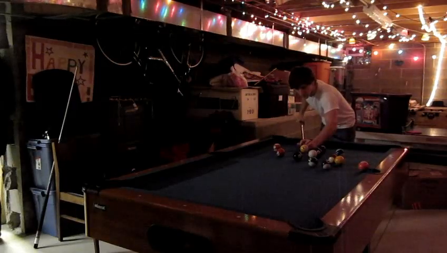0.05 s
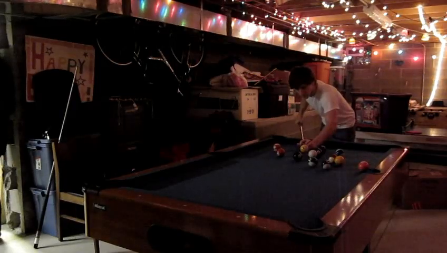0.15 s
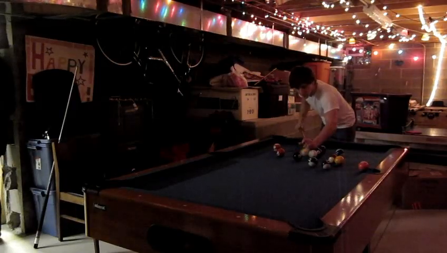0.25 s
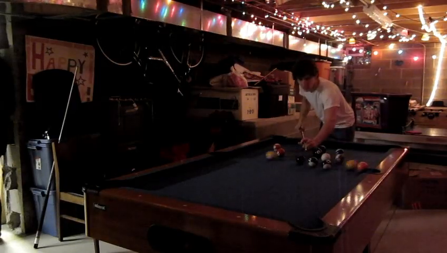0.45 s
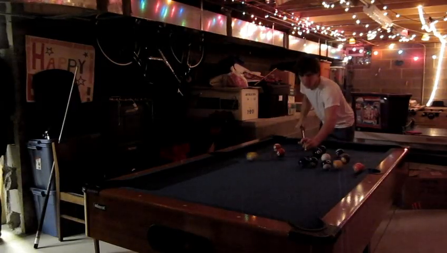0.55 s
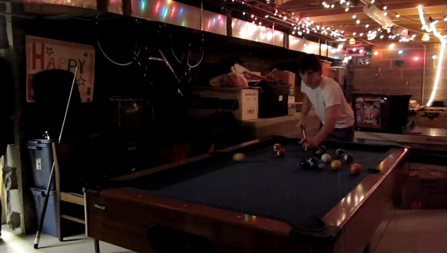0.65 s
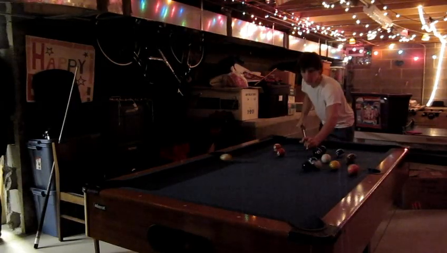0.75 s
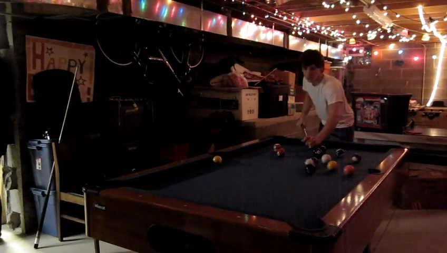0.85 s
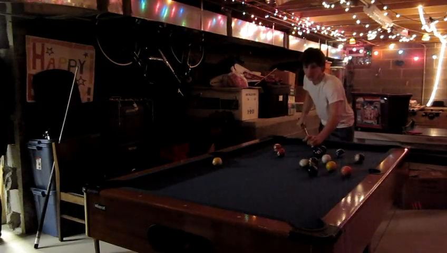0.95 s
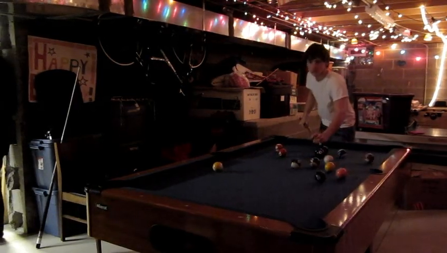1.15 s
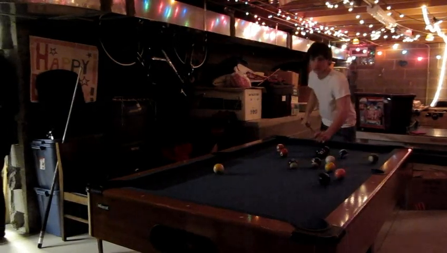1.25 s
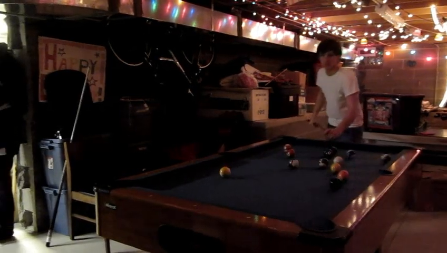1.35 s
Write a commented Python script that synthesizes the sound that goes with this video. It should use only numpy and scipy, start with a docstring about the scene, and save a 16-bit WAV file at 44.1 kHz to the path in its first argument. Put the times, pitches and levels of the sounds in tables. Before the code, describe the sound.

A pool cue cracks and balls clack together as a cluster scatters.

```python
"""Pool shot in a basement

A low room, one microphone within earshot of the table. The cue cracks, and the cue ball thuds on
the slate and scatters a cluster of balls. They clack, bump the cushions and roll nearer over a faint
hum and whine. The recorder's gain control ducks hard at the first clack and creeps back up."""
import sys
import numpy as np
from scipy import signal
from scipy.fft import rfft, irfft, next_fast_len
from scipy.io import wavfile
from scipy.ndimage import uniform_filter1d, minimum_filter1d

SR = 44100
rng = np.random.default_rng(int(sys.argv[2]) if len(sys.argv) > 2 else 0)


def output_pcm(signal):
    """Save a mono or channel-first signal as 16-bit PCM at the path in sys.argv[1].

    Samples are clipped to [-1, 1] before scaling.
    """
    pcm = np.clip(np.atleast_2d(signal).T, -1, 1) * 32767
    wavfile.write(sys.argv[1], SR, np.round(pcm).astype(np.int16))


N = 61739

# cue strike, then the ball landing and skipping: t/s, thud/dB, crack/dB, snap/dB
CUE_KNOCKS = [(0.2192, -5.5, -20, -11), (0.2532, -6, -39.5, -21), (.267, -14, -28, -17)]
# ball on ball: t/s, level/dB, pitch/Hz, room send/dB
BALL_CONTACTS = [(0.2789, 13.5, 2660, 0.5), (0.342, 14, 2660, -1.5), (0.3439, 8.5, 2350, -8.5),
                 (0.3455, 14, 2740, -7.5), (.4366, 9, 2685, 1), (0.477, 4, 2410, 1.5),
                 (0.6186, -1, 2300, 2.5)]


def amp(db):
    """Decibels to gain."""
    return 10 ** (np.asarray(db) / 20)


def along(points, hz):
    """Values at hz, read from (f/Hz, value) points on a log frequency axis."""
    freqs, values = np.transpose(points)
    return np.interp(np.log(hz + 1), np.log(freqs + 1), values)


def clock():
    """Time of every sample in seconds."""
    return np.arange(N) / SR


def fade(t, t60):
    """Exponential decay of 60 dB in t60 seconds."""
    return np.exp(-np.log(1000) * t / t60)


def delayed(x, seconds):
    """x starting that many seconds later."""
    return np.pad(x, (max(round(seconds * SR), 0), 0))[:N]


def filtered(x, response):
    """x through a zero-phase filter of gain response(hz)."""
    size = next_fast_len(N + SR // 2)
    return irfft(rfft(x, size) * response(np.fft.rfftfreq(size, 1 / SR)), size)[:N]


def noise(spectrum, shift=1):
    """Coloured noise of rms 1, its spectrum scaled in pitch by shift."""
    x = filtered(rng.standard_normal(N), lambda hz: amp(along(spectrum, hz / shift)))
    return x / np.sqrt(np.mean(x ** 2) + 1e-20)


def pulse(spectrum, shift, size=2048):
    """A minimum-phase pulse of peak 1, its spectrum scaled in pitch by shift."""
    hz = np.fft.rfftfreq(size, 1 / SR)
    cepstrum = irfft(np.log(amp(along(spectrum, hz / shift))))
    cepstrum[1:size // 2] *= 2
    cepstrum[size // 2 + 1:] = 0
    click = irfft(np.exp(rfft(cepstrum)))
    return np.pad(click / np.abs(click).max(), (0, N - size))


def modes(table):
    """A struck body rings as damped sines of alternating sign."""
    t = clock()
    return sum((-1) ** k * amp(db) * fade(t, t60) * np.sin(2 * np.pi * hz * t)
               for k, (hz, db, t60) in enumerate(table))


def room(x, build_s=0.0034):
    """The basement's diffuse answer, different for every spot on the table."""
    # reverberation time: f/Hz, t60/s
    decay_times = [(150, 0.75), (600, 0.26), (2500, 0.34), (7000, 0.28)]
    hz, t, bands = signal.stft(rng.standard_normal(SR // 2), SR, nperseg=256)
    envelope = fade(t, along(decay_times, hz)[:, None]) * (1 - np.exp(-t / build_s))
    tail = signal.istft(bands * envelope, SR)[1]
    return signal.fftconvolve(x, tail / np.linalg.norm(tail))[:N]


def room_tone(air_db=-43):
    """Basement air with mains hum and a thin whine."""
    # hum and whine: f/Hz, rms level/dB
    tones = [(120, -51), (221, -53), (1061, -50)]
    # spectrum of the air: f/Hz, level/dB
    air = [(25, -20.5), (70, -9), (130, -2.5), (230, -6), (320, -0.5), (420, -11), (650, -12.5), (800, -12),
           (1080, -11.5), (1300, -16), (3000, -18), (5000, -22), (6200, -31), (7700, -61.5)]
    t = clock()
    hum = sum(amp(db) * np.sqrt(2) * np.sin(2 * np.pi * (hz * t + rng.random())) for hz, db in tones)
    return hum + amp(air_db) * noise(air)


def rolling(start_db=-52, rise_db_per_s=11):
    """Balls rumble over the cloth from the first clack on, louder as they near the microphone."""
    # spectrum of balls on cloth: f/Hz, level/dB
    rumble = [(25, -17), (70, -3), (130, -3), (220, 3.5), (340, -11), (600, -14), (1500, -17.5),
              (4000, -29), (7000, -59)]
    approach = amp(start_db + rise_db_per_s * clock())
    return delayed(approach * noise(rumble), BALL_CONTACTS[0][0])


def cushions(rise_s=0.021, t60=0.19, reference_hz=383):
    """Soft, dull bumps that swell and die in the rails."""
    # balls meeting the cushions: t/s, level/dB, pitch/Hz
    bumps = [(.447, -19.5, 318), (.615, -36, 216), (.622, -30, 457), (.838, -31, 330), (.852, -33, 740)]
    # spectrum of a bump at the reference pitch: f/Hz, level/dB
    rail = [(40, -34.5), (150, -21.5), (310, -7), (400, -0.5), (490, -12), (800, -12.5), (3000, -36),
            (7000, -77)]
    t = clock()
    swell = np.minimum(t / rise_s, 1) * fade(np.maximum(t - rise_s, 0), t60)
    return sum(delayed(amp(db) * swell * noise(rail, hz / reference_hz), at) for at, db, hz in bumps)


def table_push(gain_db=-19, push_s=0.0043):
    """The cue's blow gives the table one deep push."""
    age = clock() / push_s
    return delayed(amp(gain_db) * age * (2 - age) * np.exp(-age), CUE_KNOCKS[0][0])


def cue_strike(rise_s=0.00014, room_db=-4):
    """Each knock is a woody snap that rings the body and throws a broad crack into the room."""
    # modes of cue and table: f/Hz, level/dB, t60/s
    body = [(191.4, -3, 0.046), (254.2, 3, 0.031), (365.3, -5.5, 0.13), (435, -8, 0.1), (585.4, -12, 0.083),
            (787, -13.5, .07), (965.5, -13.5, 0.1)]
    # spectrum of the lingering crack: f/Hz, level/dB
    broad = [(30, -5), (110, -8), (190, -11), (450, 9), (980, 5), (1120, 3.5), (1700, 3), (3200, -3.5),
             (5400, -8), (6900, -25.5), (7800, -52)]
    # spectrum of the short snap: f/Hz, level/dB
    woody = [(30, -25.5), (150, -15), (500, 4), (950, -14), (1200, -11.5), (3000, -27), (5500, -29.5),
             (8000, -66)]
    t, out = clock(), np.zeros(N)
    attack = 1 - np.exp(-t / rise_s)
    for at, thud_db, crack_db, snap_db in CUE_KNOCKS:
        thud = amp(thud_db) * modes(body)
        crack = amp(crack_db) * noise(broad) * fade(t, t60=1)
        snap = amp(snap_db) * noise(woody) * fade(t, t60=0.015)
        out += delayed(thud + amp(room_db) * room(thud) + (crack + snap) * attack, at)
    return out


def clacks(reference_hz=2600, wall_s=0.002067, wall_db=-15.5):
    """Ball hits ball: a very short pulse, a brief ring, a near reflection and the room's tail."""
    # click straight to the microphone, at the reference pitch: f/Hz, level/dB
    direct = [(100, -41.5), (800, -26.5), (1400, -13), (2000, -3.5), (2550, 0.5), (3200, -6), (4100, -7.5),
              (5200, -23.5), (6200, -48), (8000, -61)]
    # broader click sent into the room, at the reference pitch: f/Hz, level/dB
    radiated = [(100, -39), (700, -17), (1300, -15), (2000, -4), (2550, -2.5), (3200, -5), (4100, -11),
                (5200, -23.5), (6200, -38), (8000, -60.5)]
    # ring after the contact: f/Hz, level/dB, t60/s
    ring = [(2503, -15.5, .02), (2590, -19, 0.029), (2820, -17.5, 0.022), (4170, -23.5, 0.0098)]
    out = np.zeros(N)
    for at, db, hz, room_db in BALL_CONTACTS:
        click = pulse(direct, hz / reference_hz)
        reflection = amp(wall_db) * delayed(click, wall_s)
        tail = amp(room_db) * room(pulse(radiated, hz / reference_hz))
        out += amp(db) * delayed(click + modes(ring) + reflection + tail, at)
    return out


def scene():
    """Everything that reaches the microphone, in mono."""
    return (cue_strike() + table_push() + clacks() + cushions() + rolling() + room_tone())[None]


def gain_control(x, ceiling_db=-11, hold_s=0.13, recovery_s=0.42, start_duck_db=4, smooth_samples=16):
    """The recorder ducks at once on peaks over the ceiling, holds, then recovers ever more slowly."""
    over_db = np.maximum(20 * np.log10(np.abs(x) + 1e-9) - ceiling_db, 0)
    hold = 2 * int(hold_s * SR / 2) + 1
    held_db = -minimum_filter1d(-over_db, hold, origin=hold // 2, mode="constant")
    relax = np.exp(-clock() / recovery_s)
    # each duck relaxes until a deeper one takes over
    duck_db = np.maximum.accumulate(np.maximum(held_db / relax, start_duck_db)) * relax
    gain = minimum_filter1d(amp(-duck_db), smooth_samples)
    return x * uniform_filter1d(gain, smooth_samples)


def record(dry):
    """The recorder adds its gain control, its own hiss and a steep band limit."""
    # spectrum of the recorder's hiss: f/Hz, level/dB
    hiss = [(30, 1), (300, 8), (1500, 0.5), (4000, 1), (5600, -5), (6500, -17.5), (7200, -26), (7800, -60)]
    hiss_db, top_hz = -56, 7600
    x = gain_control(dry[0]) + amp(hiss_db) * noise(hiss)
    return filtered(x, lambda hz: 1 / (1 + (hz / top_hz) ** 60))[None]


dry = scene()
out = record(dry)
output_pcm(out)
```